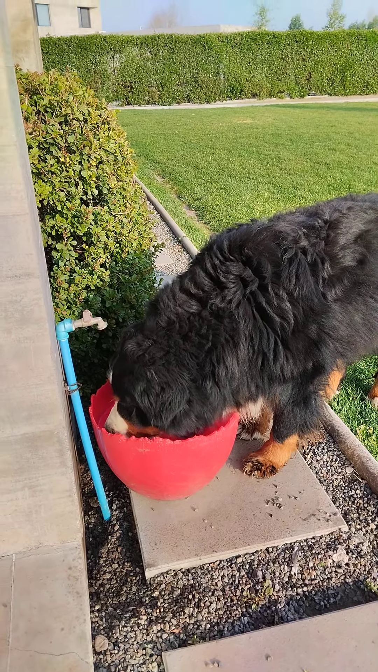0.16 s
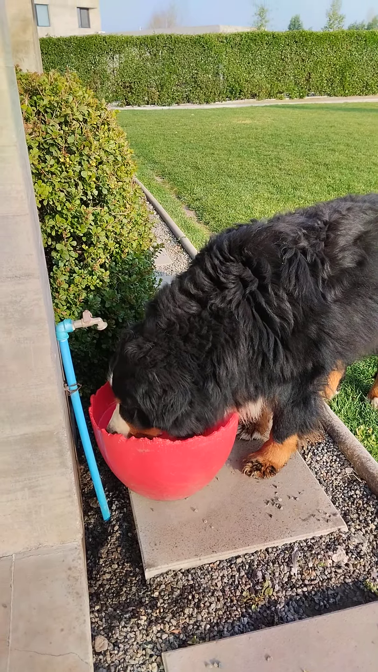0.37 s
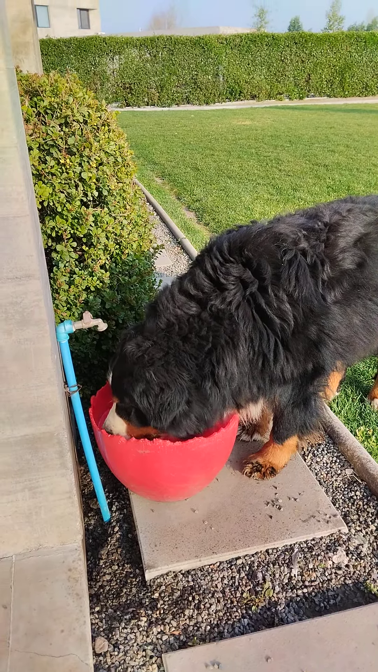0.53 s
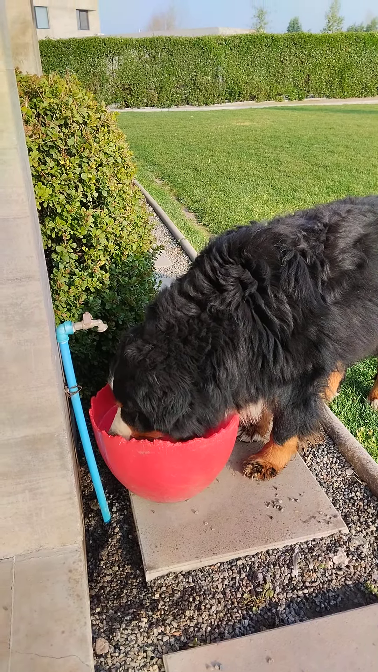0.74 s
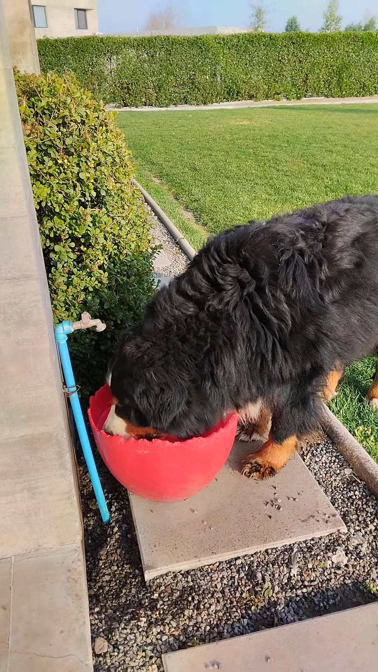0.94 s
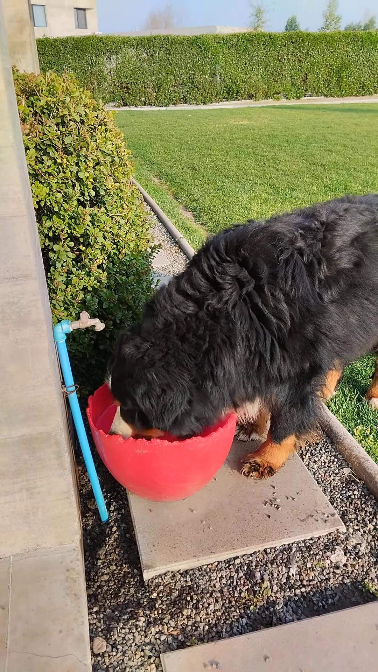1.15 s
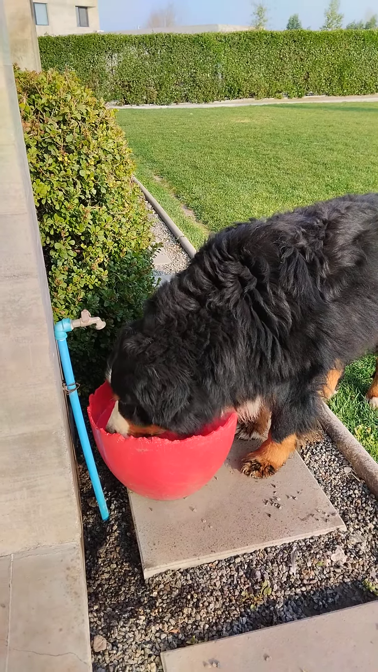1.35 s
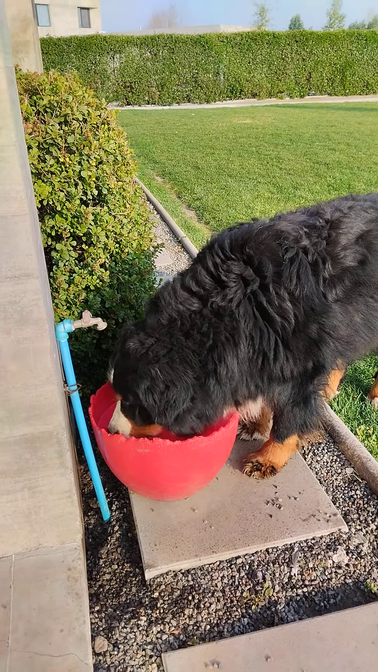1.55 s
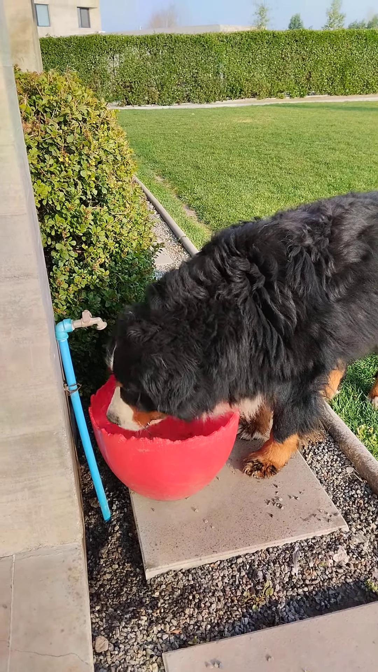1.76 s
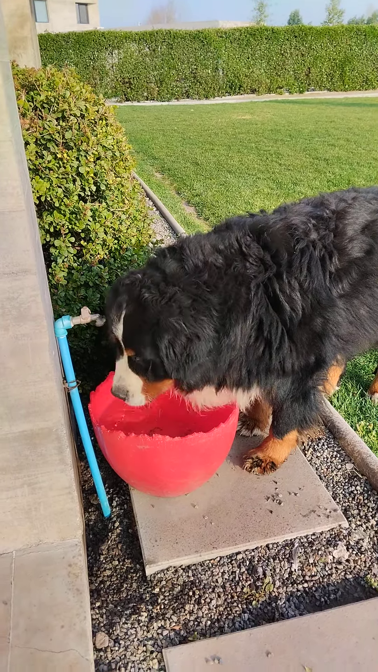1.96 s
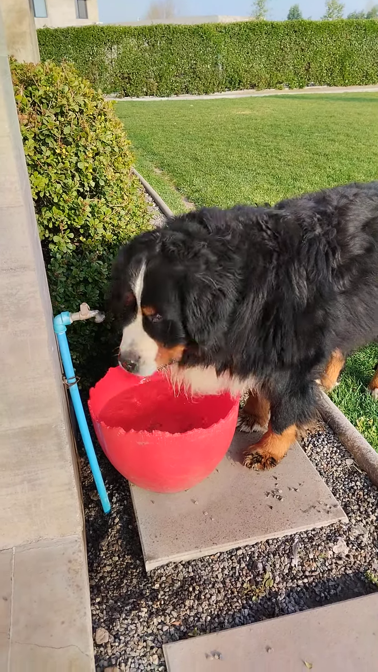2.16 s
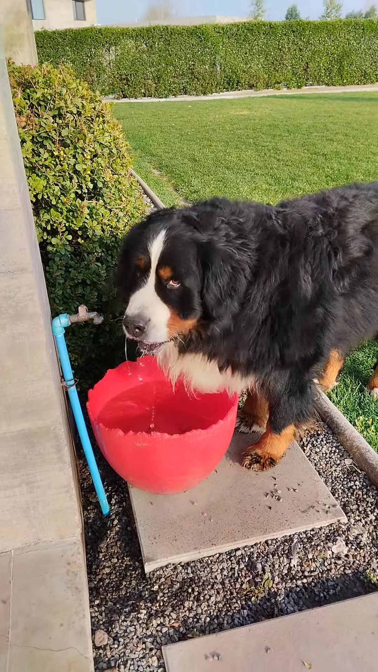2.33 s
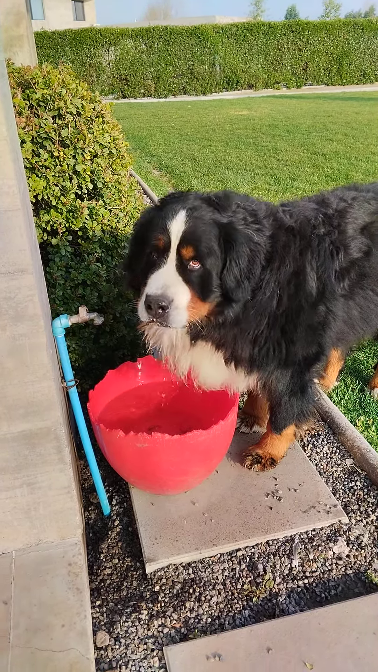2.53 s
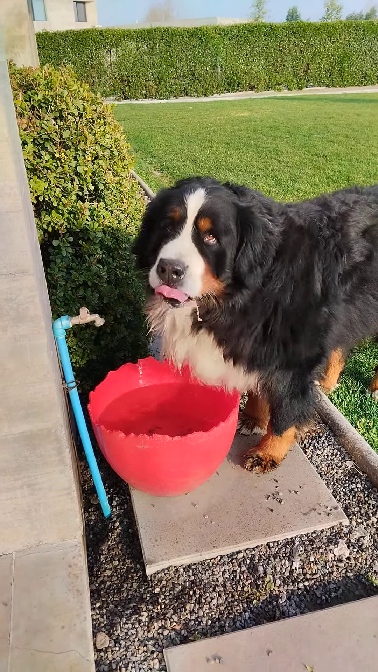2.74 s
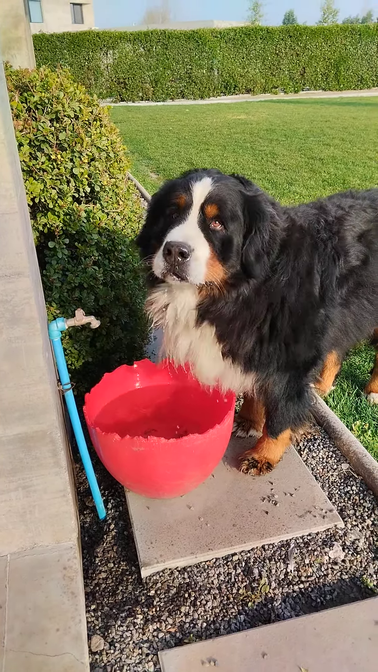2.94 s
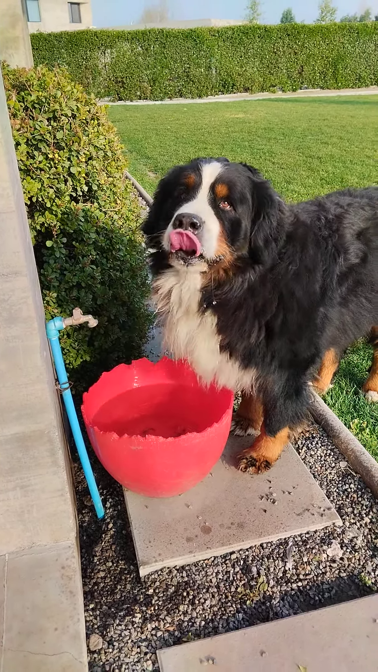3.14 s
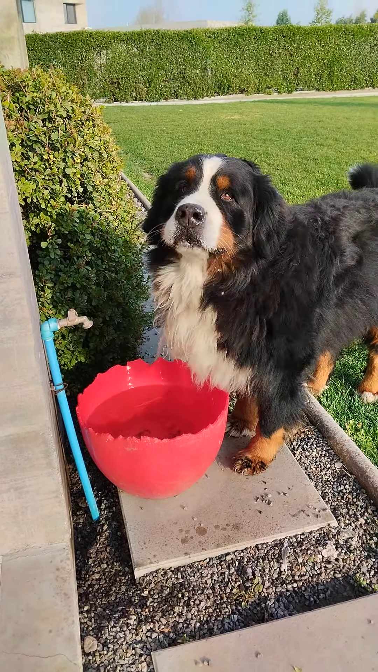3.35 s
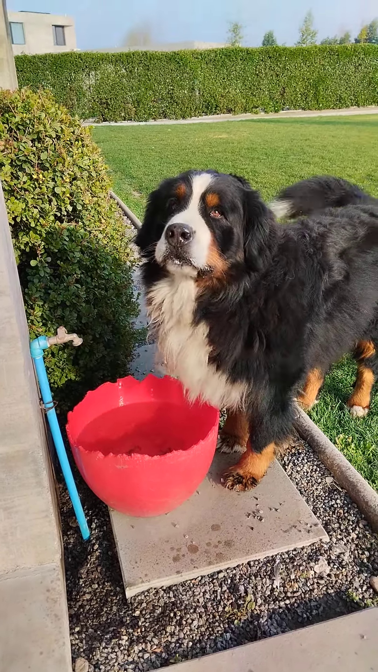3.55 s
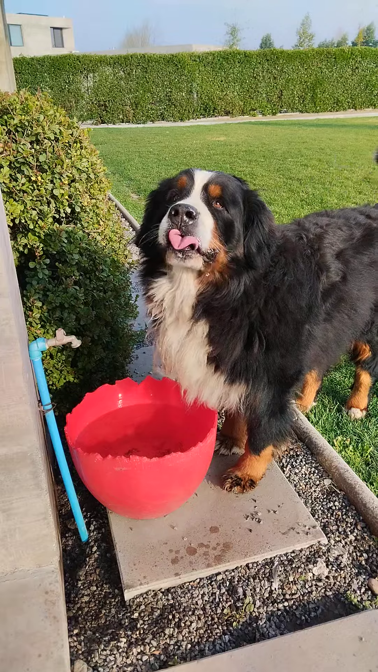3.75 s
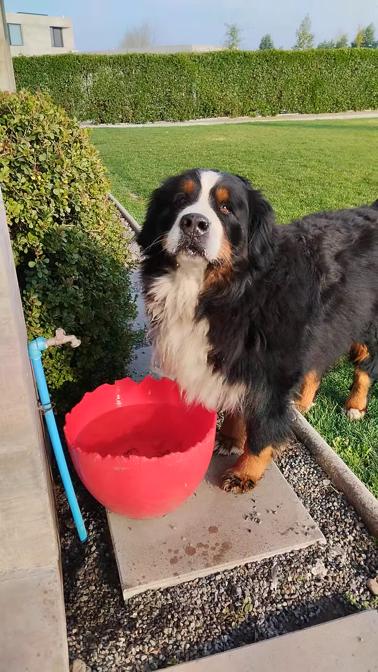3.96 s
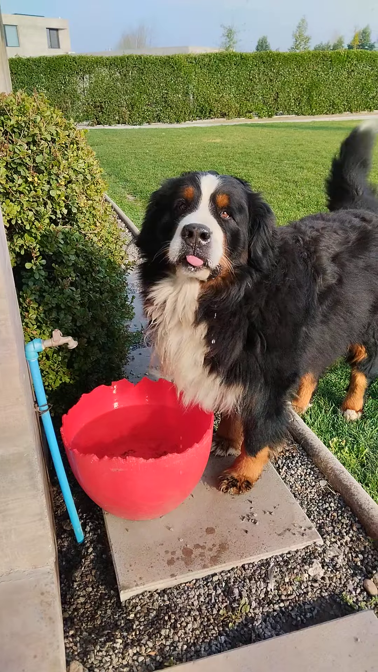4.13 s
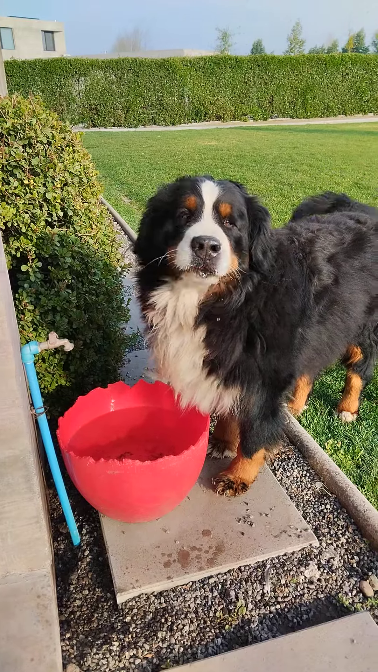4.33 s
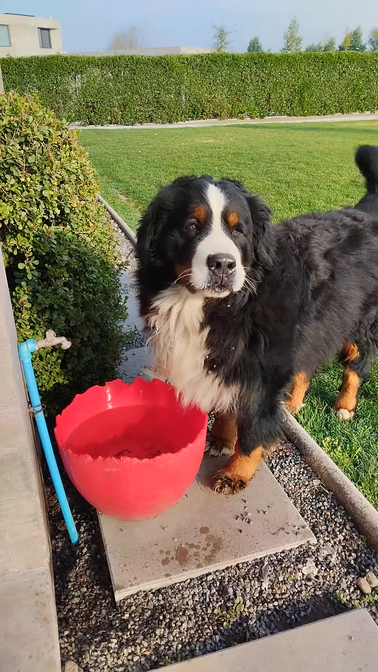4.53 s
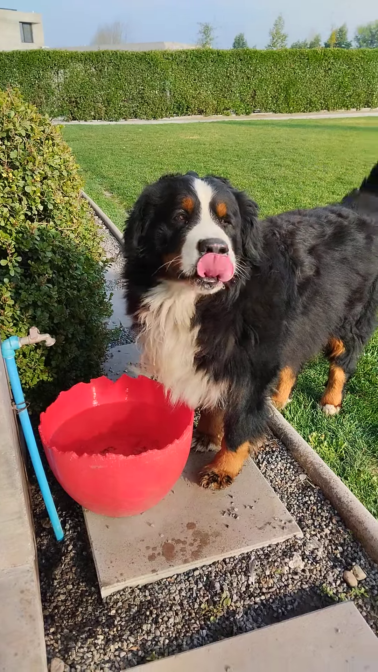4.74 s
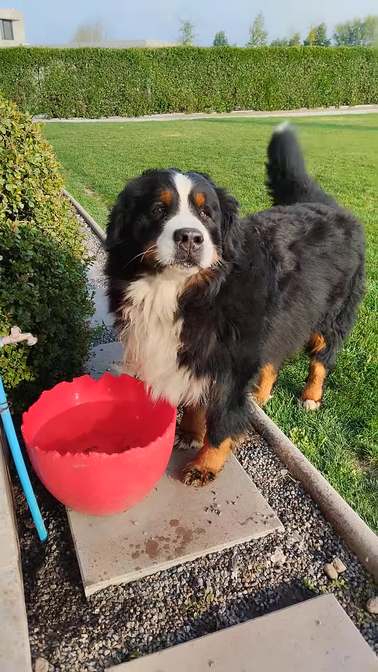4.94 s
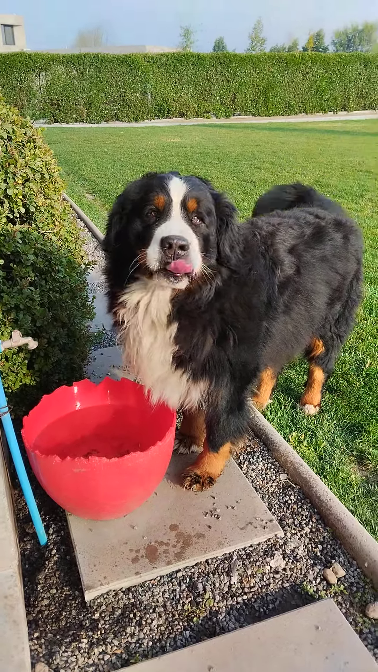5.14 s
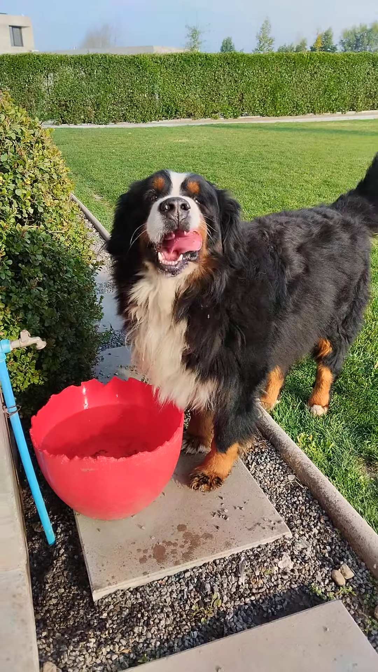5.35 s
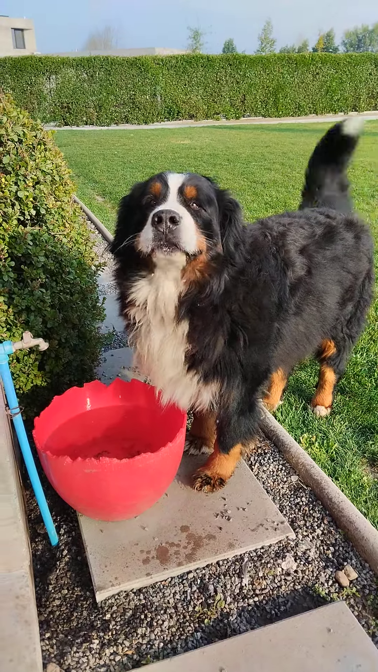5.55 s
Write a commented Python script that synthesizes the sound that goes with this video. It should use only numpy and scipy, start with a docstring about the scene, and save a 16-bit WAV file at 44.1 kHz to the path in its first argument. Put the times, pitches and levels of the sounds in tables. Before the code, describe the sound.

A big dog laps water in wet, splashy gulps from a plastic bowl outdoors, then snuffles, smacks and licks its chops.

```python
"""A faint outdoor rumble and leaf hiss lie under a big dog lapping water: fizz, crackling smacks and
gliding cavity tones for the gulps. Small birds chirp from time to time as swept sines. Then the dog
snuffles (filtered noise in puffs), slaps its wet jowls (low damped tones), whistles through wet nose
and lips (narrow-band noise), and licks its chops with soft smacks and sticky bubble ticks.
A house wall echoes, and a short decaying tail of scattered sound follows."""
import sys
import numpy as np
from scipy import signal
from scipy.fft import rfft, irfft, next_fast_len
from scipy.io import wavfile
from scipy.ndimage import map_coordinates

SR = 44100
rng = np.random.default_rng(int(sys.argv[2]) if len(sys.argv) > 2 else 0)


def generate_wav(signal):
    """Clip the signal to [-1, 1] and save it as 16-bit WAV at the path in sys.argv[1]."""
    frames = np.transpose(np.atleast_2d(signal))
    scaled = np.clip(frames, -1, 1) * 32767
    pcm = np.round(scaled).astype(np.int16)
    wavfile.write(sys.argv[1], SR, pcm)


N = 250929
TOP_HZ = 16150  # upper band limit

# Laps, each stirring the water and ending in a gulp:
# gulp t/s, stirring lead before it t/s, slosh level/dB, gulp f/Hz, gulp peak level/dB
LAPS = [(.0075, 0.011, -62.5, 193, -34), (.3435, 0.12, -61, 223, -31.5), (0.6975, 0.14, -60, 237, -31.5),
        (1.079, 0.1, -63, 239, -38.5), (1.567, .115, -59.5, 213, -34), (1.918, 0.095, -63, 212, -38.5),
        (2.465, 0.21, -59.5, 422, -30)]


def amp(db):
    """Logarithmic level: decibels to an amplitude ratio."""
    return 10 ** (np.asarray(db) / 20)


def unit(x):
    """Effective value: scale a signal to rms 1."""
    return x / np.sqrt(np.mean(x ** 2) + 1e-20)


def clock(seconds):
    """Uniform sampling: sample times from zero."""
    return np.arange(int(seconds * SR)) / SR


def wobble(rate):
    """Band-limited fluctuation: a smooth random curve with rate knots a second."""
    knots = rng.standard_normal(int(N * rate / SR) + 4)
    return map_coordinates(knots, [np.arange(N) * rate / SR])


def add(track, s, sound):
    """Superposition: mix a sound into the track at time s."""
    part = track[max(0, round(s * SR)):][:len(sound)]
    part += sound[:len(part)]


def colour(x, points):
    """Minimum-phase filtering: a causal response through (f/Hz, level/dB) points, by folded cepstrum."""
    m = 2 * next_fast_len(len(x))
    hz, db = np.transpose(points)
    log_hz = np.log(np.fft.rfftfreq(m, 1 / SR) + 1)
    response_db = np.interp(log_hz, np.log(hz), db)
    cepstrum = irfft(np.log(amp(response_db)))
    cepstrum[1:m // 2] *= 2
    cepstrum[m // 2 + 1:] = 0
    return irfft(rfft(x, m) * np.exp(rfft(cepstrum)), m)[:len(x)]


def patchy(x, depth_db, width_hz, seconds):
    """Time-varying resonance: a random gain field over time and frequency, as wet passages change shape."""
    z = signal.stft(x, nperseg=512)[2]
    band, frame = np.indices(z.shape, dtype=float)
    band = band * SR / 512 / width_hz
    frame = frame * 256 / SR / seconds
    field = map_coordinates(rng.standard_normal((260, 600)), [band, frame], order=1, mode="wrap")
    return signal.istft(z * amp(depth_db * unit(field)), nperseg=512)[1][:len(x)]


def crackle(size, rate, hiss):
    """Shot noise: tiny films of water burst at random, rate a second, over a smooth hiss."""
    pops = (rng.random(size) < rate / SR) * rng.standard_normal(size)
    return unit(pops) + hiss * rng.standard_normal(size)


def ring(hz, t60, glide, onset_cycles):
    """Damped resonance: a cavity tone rises, glide octaves per t60, as the cavity shrinks."""
    t = clock(1.5 * t60)
    phase = 2 * np.pi * np.cumsum(hz * 2 ** (glide * t / t60)) / SR
    shape = amp(-60 * t / t60) * (1 - np.exp(-t * hz / onset_cycles))
    return np.sin(phase) * shape / shape.max()


def droplets(rise, hz, spread, cycles, rate, size=24):
    """Bubble resonance: a cluster of tiny bubbles rings at scattered pitches (spread in octaves)."""
    delay = rng.triangular(.2, .9, 2.4, size)  # in rise times
    cloud = np.column_stack([delay, rng.standard_normal(size), rng.uniform(.73, 1, size)])
    when, high, strength = cloud[:2 + int(rate * rise)].T[..., None]
    pitch = np.minimum(hz * 2 ** (spread * high), TOP_HZ)
    age = np.maximum(clock(.04) - rise * when, 0) * pitch  # in cycles
    decay = np.exp(-np.log(1000) * age / cycles)  # down 60 dB after this many cycles
    shape = decay * (1 - np.exp(-age))
    return unit(np.sum(strength * np.sqrt(pitch / hz) * np.sin(2 * np.pi * age) * shape, axis=0))


def swell(crest, rise, hold, fall):
    """Exponential growth and decay: 20 dB per rise or fall time, with gain 1 from crest through hold."""
    t = np.arange(N) / SR - crest
    return 10 ** np.maximum(np.minimum(t / rise, 0) + np.minimum((hold - t) / fall, 0), -10)


def garden(rumble_db=-55.5, leaves_db=-69.5):
    """Spectral shaping of white noise: a distant, slowly varying rumble and a faint leaf hiss."""
    # distant rumble spectrum: f/Hz, relative level/dB
    rumble_spectrum = [(12, -31), (20, -2.5), (35, -2.5), (52, 1), (66, -3.5), (90, -5.5), (120, -14.5),
                       (152, -12), (200, -14.5), (290, -26), (420, -25.5), (700, -40), (1500, -73)]
    # leaf hiss spectrum: f/Hz, relative level/dB
    leaf_spectrum = [(200, -21.5), (450, -3.5), (650, -1), (1050, -7.5), (1500, -10.5), (2500, -13.5),
                     (3500, -18.5), (5000, -16), (6900, -14), (8400, -21), (12000, -21), (16000, -20.5)]
    rumble = unit(colour(rng.standard_normal(N), rumble_spectrum))
    rumble = amp(rumble_db + 1.1 * wobble(2.93)) * rumble
    return rumble + amp(leaves_db) * unit(colour(rng.standard_normal(N), leaf_spectrum))


def slosh(count=1000):
    """Bubble entrainment: stirred water fizzes and sheds many short-lived bubbles of all sizes."""
    # stirred water spectrum: f/Hz, relative level/dB
    water_spectrum = [(300, -21.5), (600, 27), (1000, -14), (2000, 1), (4000, 1), (7000, 13.5), (9000, 0),
                      (15000, -13)]
    rise_s, linger_s, fall_s = 0.048, 0.005, .17  # rise and fall span 20 dB
    stir = sum(amp(db) * swell(s - lead, rise_s, lead + linger_s, fall_s) for s, lead, db, _, _ in LAPS)
    drink_s = LAPS[-1][0] + fall_s
    bubbles = np.zeros(N)
    for when, size, strength in rng.random((count, 3)):
        hz = 600 * 15 ** size
        bubble = ring(hz, 18 / hz + .006, .08, onset_cycles=.5)
        add(bubbles, when * drink_s, strength ** 3 * bubble)
    fizz = colour(crackle(N, rate=790, hiss=1.0), water_spectrum) * amp(4.7 * wobble(90))
    fizz = unit(patchy(fizz, depth_db=4.5, width_hz=450, seconds=.012))
    return stir * unit(fizz + 1.2 * unit(bubbles))


def soft_contacts(start, length, db, count):
    """Random scatter: rows for small contacts spread loosely over one stroke of the tongue."""
    rise_s, centre_hz = .0052, 5160
    mouth_db, spray_db, scatter_db = -5.5, -10.5, 2.5  # mouth and spray against squelch; chance spread
    times = start + length * (np.arange(count) + rng.random(count)) / count
    slow, high, squelch, mouth, spray = rng.standard_normal((count, 5)).T
    return np.column_stack([
        times,
        rise_s * 2 ** (.45 * slow),
        db + scatter_db * squelch,
        centre_hz * 2 ** np.clip(0.24 * high, -.5, .5),
        db + mouth_db + scatter_db * mouth,
        db + spray_db + scatter_db * spray])


def contacts(lap_db=1, after_s=0.029):
    """Impact sequence: the loud smacks, and the soft ones that go with every lap and lick."""
    # loudest wet contacts of tongue, water and lips, levels before the trims in smacks():
    # t/s, rise t/s, squelch level/dB, squelch f/Hz, mouth level/dB, spray level/dB
    loud_contacts = [(.2295, 0.0069, -50.5, 5200, -52, -75), (.2545, 0.0016, -46, 4050, -56, -75),
                     (.279, 0.0049, -47, 5300, -79, -66), (.315, 0.0017, -49.5, 6600, -64, -50),
                     (.3695, .0025, -50.5, 6400, -66, -80), (.546, 0.0022, -53, 4800, -57, -65),
                     (.6485, 0.0025, -44, 4020, -50.5, -53), (.6665, 0.0031, -42, 6850, -61, -58),
                     (.745, 0.0052, -54.5, 5720, -54, -75), (.958, 0.0051, -48.5, 5200, -44, -63),
                     (1.0265, .003, -42.5, 4250, -46.5, -59), (1.0355, 0.0051, -48, 6200, -51, -53),
                     (1.421, 0.0019, -42, 5880, -76, -78), (1.4515, 0.0043, -50.5, 4800, -51.5, -72),
                     (1.4715, 0.0026, -48, 6240, -72, -61), (1.494, .001, -40, 6060, -70, -80),
                     (1.518, .0044, -38, 4450, -52, -45), (1.8205, 0.0048, -51, 5860, -53, -83),
                     (1.864, 0.0018, -42.5, 3800, -62, -72), (1.995, 0.0066, -56, 2750, -70, -83),
                     (2.1105, 0.00091, -54, 8600, -80, -72), (2.2735, 0.0037, -41.5, 6300, -77, -52),
                     (2.285, 0.0041, -39.5, 6100, -49, -60), (2.3865, 0.0026, -42, 6500, -77, -52),
                     (2.407, 0.008, -49.5, 7000, -60, -51), (2.451, 0.0047, -48.5, 3780, -77, -55),
                     (2.4685, 0.003, -30.5, 7770, -52, -59), (2.821, 0.0064, -40.5, 5330, -40.5, -56),
                     (2.8415, 0.0059, -39.5, 4800, -45, -53), (2.851, 0.005, -36.5, 5120, -36.5, -49),
                     (3.1295, 0.00087, -39.5, 5500, -75, -70), (3.159, .0016, -30, 7900, -75, -36),
                     (3.292, 0.0052, -46.5, 5300, -66, -52.5), (3.519, 0.00133, -57, 7150, -76, -56),
                     (3.8265, 0.0032, -28, 6200, -61, -44), (3.878, 0.0073, -33.5, 4560, -42, -66),
                     (3.888, 0.008, -38, 4100, -42.5, -68), (4.2279, 0.00069, -52, 4120, -76, -68),
                     (4.3095, 0.0073, -52, 5800, -58.5, -68), (4.3505, 0.0046, -49.5, 7700, -57, -66),
                     (4.644, 0.0073, -59.5, 5700, -58, -62), (4.899, 0.0056, -51, 3800, -54.5, -66),
                     (5.2985, 0.003, -51.5, 5200, -81, -81), (5.4385, 0.0024, -37, 8800, -60, -37),
                     (5.5585, .0054, -48.5, 6560, -58.5, -53)]
    # tongue strokes round the chops: t/s, length t/s, contact level/dB before scatter and trims
    lick_strokes = [(3.222, 0.22, -55), (3.893, .03, -52), (4.35, 0.048, -65), (4.599, .07, -59.5),
                    (4.751, 0.19, -58), (5.189, 0.14, -70.5)]
    lapping = [soft_contacts(s - lead, lead + after_s, db + lap_db, count=6) for s, lead, db, _, _ in LAPS]
    licking = [soft_contacts(s, length, db, count=4) for s, length, db in lick_strokes]
    return np.vstack([loud_contacts, *lapping, *licking])


def smacks(squelch_db=-1, mouth_db=-1, spray_db=-1, width=1.204, tail_db=-24):
    """Transient excitation of resonances: brief crackle and droplets sound lips, hollow mouth and spray."""
    # hollow mouth spectrum: f/Hz, relative level/dB
    mouth_spectrum = [(250, -5), (550, 13), (900, -6.5), (1700, -2.5), (2500, 6), (4000, -0.5), (8000, -59)]
    # fine spray spectrum: f/Hz, relative level/dB
    spray_spectrum = [(6000, -21.5), (8500, -10), (10000, -10.5), (11500, -4), (15500, -9.5)]
    out = np.zeros(N)
    for s, rise, db, hz, low_db, top_db in contacts():
        u = clock(.04) / rise
        shape = u * np.exp(-u * u / 2) + amp(tail_db) * np.minimum(u, 1) * np.exp(-u / 3)
        squelch = [(900, -40), (hz / width ** 2, -9), (hz / width, -4), (hz, 0),
                   (max(hz + 100, 7800), -4), (10500, -22), (16000, -36)]
        parts = [(squelch, hz, db + squelch_db),
                 (mouth_spectrum, 1450, low_db + mouth_db),
                 (spray_spectrum, 11500, top_db + spray_db)]
        for points, centre, level in parts:
            film = colour(shape * crackle(len(u), rate=2500, hiss=0.53), points)
            drops = colour(droplets(rise, centre, spread=.45, cycles=32, rate=1400), points)
            # lips and tongue enclose a new cavity each time, with its own resonances
            cavity = np.column_stack([np.geomspace(500, 16000, 26), 4 * rng.standard_normal(26)])
            burst = unit(colour(unit(film) + unit(drops), cavity))
            add(out, s, amp(level) * burst * np.sqrt(1.53 / u[-1]))  # rms refers to 1.53 rise times
    return out


def pockets():
    """Cavity resonance: gulps, clops, plops and jowl slaps as damped tones that glide upward."""
    # air pockets ringing in the water or under the lips: t/s, f/Hz, peak level/dB, t60/s
    air_pockets = [(.397, 770, -49, 0.041), (0.723, 388, -46.5, 0.054), (0.747, 914, -37.5, 0.016),
                   (0.818, 1640, -58, 0.057), (1.132, 826, -47.5, 0.025), (1.43, 2070, -49, .049),
                   (1.518, 4200, -35, 0.025), (1.521, 2310, -41.5, .03), (1.525, 1240, -47, 0.055),
                   (2.451, 3920, -38.5, 0.037), (2.484, 975, -45.5, 0.036), (2.8256, 476, -28.5, 0.032),
                   (2.854, 1660, -36.5, .04), (2.8554, 386, -25.5, 0.028), (3.829, 804, -45, 0.071),
                   (3.88, 745, -37.5, 0.029), (3.97, 380, -44.5, 0.018), (4.3565, 446, -40.5, .025),
                   (4.3565, 760, -47.5, .075)]
    # loose jowls slapping shut: t/s, f/Hz, peak level/dB, t60/s
    jowl_slaps = [(3.880, 77, -38.5, 0.11), (3.89, 182, -42, 0.034)]
    # tongue strikes that make the open mouth ring hollow: t/s, level/dB
    clop_strikes = [(.62, -45.5), (.65, -47), (.9625, -31.5), (1.028, -34.5), (2.322, -40), (2.395, -46.5),
                    (2.828, -37), (2.855, -30.5)]
    # open-mouth modes: f/Hz, level against the strike/dB, t60/s
    mouth_modes = [(587.3, -1, 0.047), (1600, -11, 0.018)]
    gulp_t60, glide = .016, 0.18  # s, octaves per t60
    gulps = [(s, hz, db, gulp_t60) for s, _, _, hz, db in LAPS]
    clops = [(s, hz, db + mode_db, t60) for s, db in clop_strikes for hz, mode_db, t60 in mouth_modes]
    out = np.zeros(N)
    for s, hz, db, t60 in gulps + clops + air_pockets + jowl_slaps:
        add(out, s, amp(db) * ring(hz, t60, glide, onset_cycles=0.34))
    return out


def birds():
    """Frequency modulation: short chirps glide along a parabola, slightly husky from random pitch jitter."""
    # bird notes: t/s, length t/s, start f/Hz, middle f/Hz, end f/Hz, peak level/dB
    bird_notes = [(1.212, 0.02, 6740, 5460, 4260, -47.5), (2.022, 0.071, 5700, 5400, 7000, -64),
                  (2.038, 0.054, 4760, 4050, 3480, -68), (3.983, 0.015, 6300, 6200, 5600, -59),
                  (3.997, 0.034, 5050, 5640, 3550, -54), (4.682, 0.035, 5060, 6040, 4000, -57),
                  (4.968, 0.025, 7460, 5500, 4700, -43)]
    out = np.zeros(N)
    for s, length, start, middle, end, db in bird_notes:
        u = clock(length) / length
        hz = np.polyval(np.polyfit([0, .5, 1], [start, middle, end], 2), u)
        hz = hz * (1 + .03 * wobble(1500)[:len(u)])
        add(out, s, amp(db) * np.sin(np.pi * u) * np.sin(2 * np.pi * np.cumsum(hz) / SR))
    return out


def snuffle(spit_db=-10):
    """Turbulent flow noise: air hisses in the nostrils, crackles in saliva and flutters in the jowls."""
    # puffs of air, rise and fall spanning 20 dB:
    # crest t/s, rise t/s, hold t/s, fall t/s, nostril hiss level/dB, jowl flutter level/dB
    air_puffs = [(2.58, 0.18, 0.035, 0.17, -52.5, -61), (2.706, 0.13, 0.018, .22, -44, -46.5),
                 (2.829, 0.11, 0.091, .22, -50.5, -66), (3.006, 0.11, .13, 0.045, -58, -71.5),
                 (3.232, 0.027, 0.073, 0.1, -57, -73.5), (3.363, .06, 0.038, .18, -59, -59),
                 (3.82, 0.14, 0.048, 0.15, -49.5, -59.5), (4.362, 0.02, 0.012, .12, -57.5, -55),
                 (4.65, 0.11, 0.041, 0.18, -65.5, -69), (4.808, 0.11, 0.018, 0.26, -56, -69),
                 (5.184, 0.07, 0.035, 0.054, -62.5, -69.5), (5.325, 0.053, 0.17, 0.15, -63, -72),
                 (5.623, 0.086, 0.045, .1, -56.5, -64.5)]
    # nostril spectrum: f/Hz, relative level/dB
    nostril_spectrum = [(410, -27.5), (700, 4), (934, -1.5), (1040, -8.5), (1400, 0), (1580, -2.5),
                        (1770, 0), (3200, 0), (5060, 4.5), (5610, 3.5), (7290, 7.5), (9990, -7.5),
                        (11500, -4.5), (16000, -13)]
    # jowl flutter spectrum: f/Hz, relative level/dB
    jowl_spectrum = [(120, -37), (260, -3), (400, 7), (560, -2), (800, -19), (1500, -18.5), (3000, -61)]
    jowl_steepness = 1.08  # jowl flutter level in dB per dB of flow
    flow = np.array([swell(*row[:4]) for row in air_puffs])
    hiss_gain, jowl_gain = amp(np.array(air_puffs)[:, -2:].T[..., None])
    # puffs overlap as independent noises: their powers add
    nose_envelope = np.linalg.norm(hiss_gain * flow, axis=0)
    jowl_envelope = np.linalg.norm(jowl_gain * flow ** jowl_steepness, axis=0)
    hiss = unit(colour(rng.standard_normal(N), nostril_spectrum)) * amp(2.5 * wobble(60))
    spit = unit(colour(crackle(N, rate=260, hiss=.05), nostril_spectrum))
    air = unit(patchy(hiss + amp(spit_db) * spit, depth_db=2.5, width_hz=200, seconds=.08))
    flutter = unit(colour(rng.standard_normal(N), jowl_spectrum)) * amp(2.5 * wobble(70))
    return nose_envelope * air + jowl_envelope * flutter


def whistles():
    """Noise-driven resonance: airflow sounds a narrow band for a moment; saliva makes it sputter."""
    # air and saliva squeezed through wet nose and lips: t/s, length t/s, f/Hz, width f/Hz, level/dB
    wet_whistles = [(3.346, .19, 7750, 220, -64.5), (3.365, .15, 11300, 700, -75),
                    (3.388, .13, 4870, 600, -65), (3.43, 0.018, 3130, 398, -56.5),
                    (3.886, 0.028, 1370, 400, -51), (3.901, 0.12, 3860, 450, -63),
                    (3.914, 0.095, 5150, 400, -58.5), (4.355, 0.063, 433, 236, -57),
                    (4.358, .036, 2460, 300, -60.5), (4.798, 0.033, 2520, 586, -58.5),
                    (4.854, 0.069, 2440, 547, -68)]
    out = np.zeros(N)
    for s, length, hz, width_hz, db in wet_whistles:
        size = int(length * SR)
        edges = [hz - width_hz / 2, hz + width_hz / 2]
        band = signal.butter(2, edges, "bandpass", fs=SR, output="sos")
        tone = signal.sosfilt(band, crackle(size, rate=500, hiss=.8))
        add(out, s, amp(db) * unit(tone * signal.windows.tukey(size, .5)))
    return out


def saliva(level_db=-77, count=20):
    """Bubble bursts at random times: faint sticky ticks while the tongue works round the lips."""
    out = np.zeros(N)
    start, end = 3.95, 5.55  # s
    for when, size, strength in rng.random((count, 3)):
        tick = droplets(.0015, 3000 * 2.5 ** size, spread=.4, cycles=14, rate=5000)
        add(out, start + when * (end - start), amp(level_db + 6.4 * (strength + 0.5)) * tick)
    return out


def yard(x, wall_db, tail_db, t60):
    """Reflection and scattering: the house wall returns one clear echo; paving and hedge a short tail."""
    wall_delay = .0141  # s
    echo = np.zeros(N)
    add(echo, wall_delay, colour(x, [(500, -2.0), (2000, -8.5), (8000, -4.5)]))
    t = clock(.35)
    tail = rng.standard_normal(len(t)) * amp(-60 * t / t60) * (1 - np.exp(-t / 0.0086))
    scatter = signal.fftconvolve(x, tail / np.linalg.norm(tail))[:N]
    scatter = colour(scatter, [(600, 3.5), (5000, -4.5), (14000, -4.0)])
    return x + amp(wall_db) * echo + amp(tail_db) * scatter


def scene():
    """Superposition of sources: the dog near the wall, birds farther off, the garden all round."""
    water = smacks() + pockets() + slosh()
    mouth_and_nose = snuffle() + whistles() + saliva()
    dog = yard(water + mouth_and_nose, wall_db=-10.0, tail_db=-11, t60=0.12)
    far_birds = yard(birds(), wall_db=-11, tail_db=-5.5, t60=0.2)
    return (dog + far_birds + garden())[None]


def record(dry):
    """Band limitation: a sharp low-pass keeps nothing above TOP_HZ."""
    m = next_fast_len(N + SR // 2)
    passed = np.fft.rfftfreq(m, 1 / SR) < TOP_HZ
    return irfft(rfft(dry, m) * passed, m)[..., :N]


dry = scene()
out = record(dry)
generate_wav(out)
```